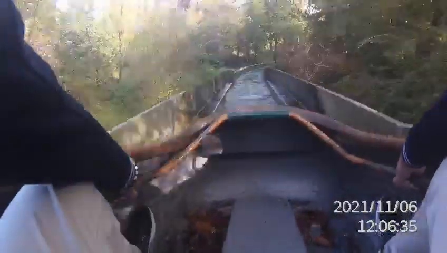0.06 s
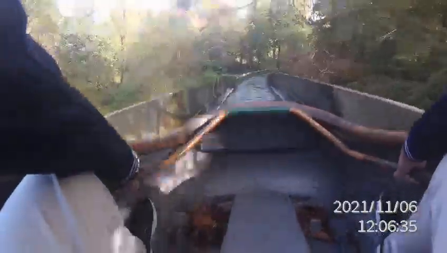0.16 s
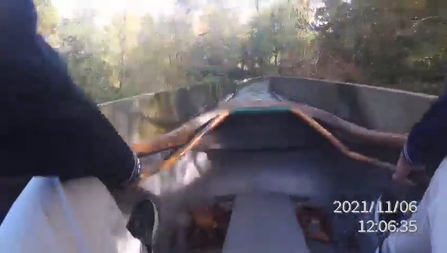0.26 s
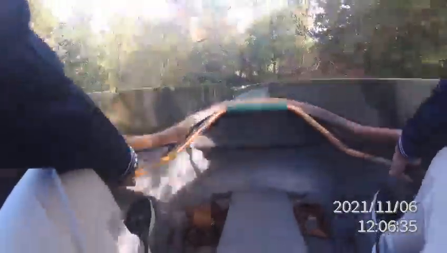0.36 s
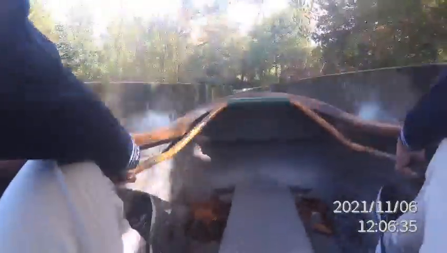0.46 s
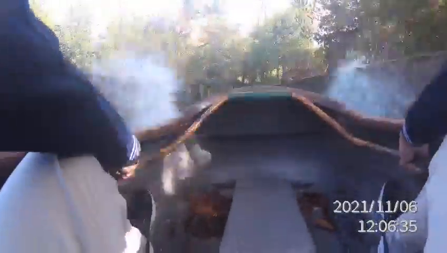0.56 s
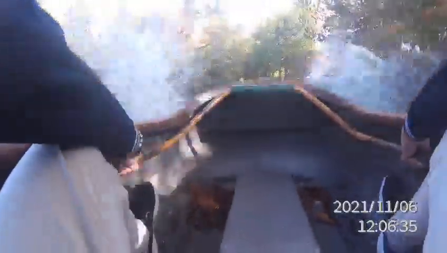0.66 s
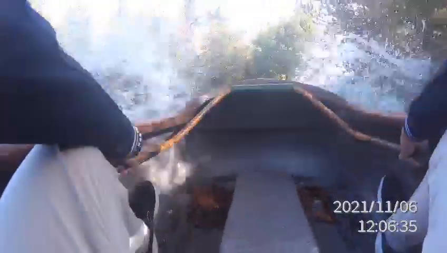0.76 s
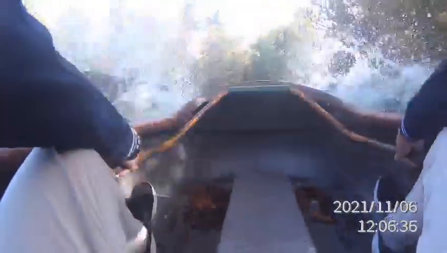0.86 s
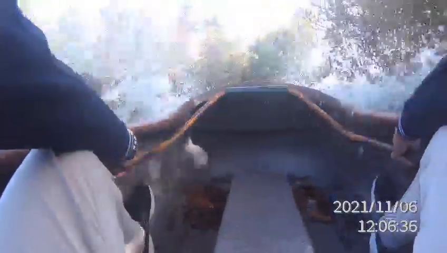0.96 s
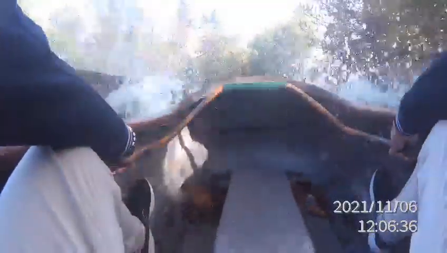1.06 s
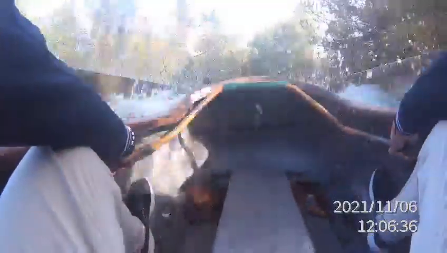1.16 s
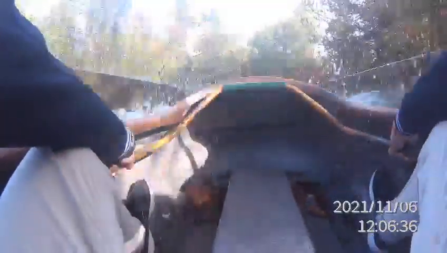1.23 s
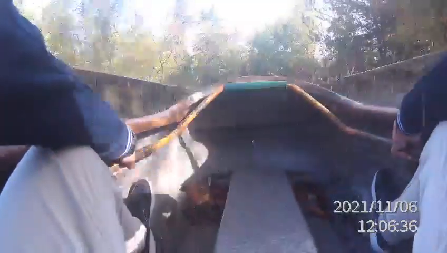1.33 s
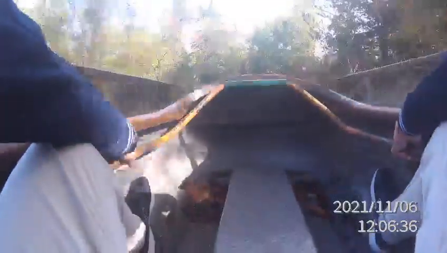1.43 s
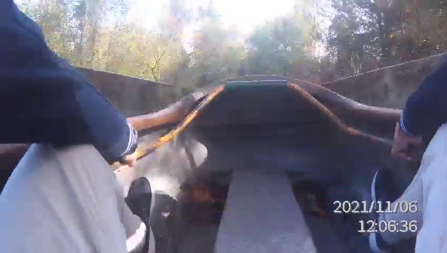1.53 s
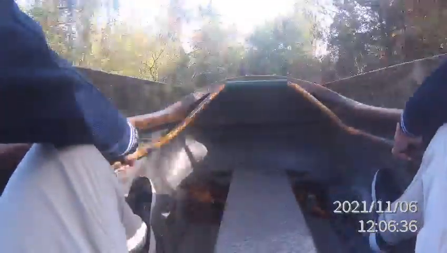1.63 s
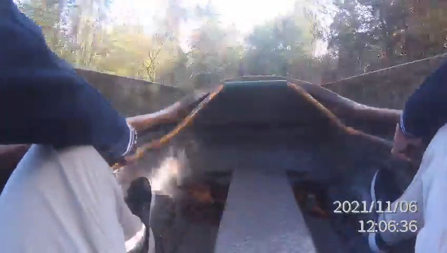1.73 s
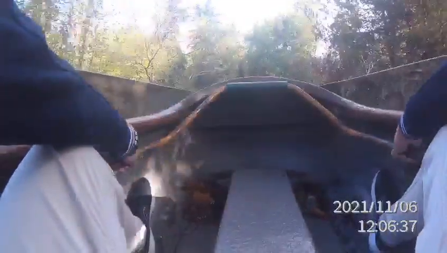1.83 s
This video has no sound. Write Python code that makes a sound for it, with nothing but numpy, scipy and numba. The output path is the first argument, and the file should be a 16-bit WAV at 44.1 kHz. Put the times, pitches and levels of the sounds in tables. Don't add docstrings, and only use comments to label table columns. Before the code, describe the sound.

A boat plunges into a pool outdoors. Rough low rolling and loud plastic clacks come first, then wet slaps and a full rushing splash, thinning to gentle wash with a few ticking drops, heard from a small case-mounted microphone aboard.

```python
import sys
import numpy as np
from scipy import signal
from scipy.fft import rfft, irfft, next_fast_len
from scipy.io import wavfile
from scipy.ndimage import uniform_filter1d
from numba import njit

SR = 44100
rng = np.random.default_rng(int(sys.argv[2]) if len(sys.argv) > 2 else 0)


def ratio_of_db(decibels):
    return 10 ** (np.asarray(decibels, float) / 20)


def to_wav(s):
    ch = np.atleast_2d(s).T
    pcm = np.round(np.clip(ch, -1, 1) * 32767)
    wavfile.write(sys.argv[1], SR, pcm.astype(np.int16))


N = 83790


def col(table, k):
    return np.interp(np.arange(N) / SR, *np.array(table).T[[0, k]])


def curve(table, hz):
    table_hz, value = np.array(table).T
    return np.interp(np.log(hz + 1), np.log(table_hz), value)


def unit(x):
    return x / np.sqrt(np.mean(x ** 2))


def walk(rate_hz):
    hold = int(SR / rate_hz)
    steps = np.repeat(rng.standard_normal(N // hold + 1), hold)
    return 0.91 * uniform_filter1d(uniform_filter1d(steps, hold), hold)[:N]


def add(out, at_s, piece):
    i = int(at_s * SR)
    out[..., i:i + piece.shape[-1]] += piece[..., :N - i]


@njit
def ring(at, hz, cycles, size, glide, length):
    y = np.zeros(length)
    for k in range(len(at)):
        w = 2 * np.pi * hz[k] / SR
        steps = int(cycles[k] * SR / hz[k])
        fade, phase = np.exp(-5 / (steps + 1)), 0.
        g = size[k]
        for i in range(at[k], min(at[k] + steps, length)):
            phase += w * (1 + glide * (i - at[k]) / steps)
            y[i] += g * np.sin(phase)
            g *= fade
    return y


TOP_HZ = 15300
# centre_hz, width_hz, level_db
CASE_PEAKS = [(297, 20, 2), (461, 100, 3.5), (821, 40, 6), (1640, 120, 1.5), (2990, 88, 4.5),
              (3520, 440, 5.5), (4940, 110, 1), (5060, 900, 4.5)]
# freq_hz, share (0-1)
ALIKE = [(200, 1), (450, 0.85), (1200, 0.85), (1550, 0), (2300, 1), (2800, 0.43), (5000, 0), (15000, 0)]


def rush(spectrum, per_s, cycles, grain_db, scatter_db, flicker_db):
    hz = np.arange(N // 2 + 1) * SR / N
    rings_db = sum(db / (1 + (2 * (hz - f) / w) ** 2) for f, w, db in CASE_PEAKS)
    colour = ratio_of_db(curve(spectrum, hz) + rings_db) * (hz < TOP_HZ)
    fields = []
    for _ in range(2):
        when, height, rarity = rng.random((int(per_s * N / SR), 3)).T
        pitch_hz = 150 * 100 ** height
        size = pitch_hz / 1000 * ratio_of_db(-scatter_db * np.log(1 - .97 * rarity))
        grains = ring((when * N).astype(np.int64), pitch_hz, cycles + 0 * pitch_hz, size, 0.34, N)
        hiss = unit(rng.standard_normal(N))
        fields.append(rfft(hiss + ratio_of_db(grain_db) * unit(grains)) * colour)
    alike = np.clip(curve(ALIKE, hz), 0, 1)
    left = alike * fields[0] + np.sqrt(1 - alike ** 2) * fields[1]
    pair = np.array([left, fields[0]])
    out, shared = 0, walk(40.15)
    for centre_hz in 45 * 2. ** np.arange(0, 9):
        octaves = np.clip(np.log2((hz + 1) / centre_hz), -1, 1)
        band = np.cos(np.pi / 2 * octaves) ** 2
        out = out + irfft(pair * band, N) * ratio_of_db(flicker_db * (shared + walk(25.07)))
    return out / np.sqrt(np.mean(out[1] ** 2))


# start_s, surge_db, spray_db, mist_db
SPLASH = [(.358, -61, -49, -66), (.367, -34, -34.5, -70), (.47, -31, -32.5, -70), (.57, -29, -27.5, -38.5),
          (.68, -34, -30.5, -42), (.76, -33, -31.5, -43.5), (.95, -31.5, -35, -46.5),
          (1.2, -35.5, -34.5, -48), (1.5, -34.5, -36, -50.5), (1.65, -38.5, -41.5, -60),
          (1.9, -40.5, -43.5, -55)]
# freq_hz, density_db (per Hz)
SURGE = [(50, -43), (130, -10.5), (300, -2), (480, -2.5), (620, -4), (900, -4), (1500, 2.5), (2600, -25.5)]
# freq_hz, density_db (per Hz)
SPRAY = [(900, -43), (1600, -8.5), (2300, -3), (3100, -2), (5500, -12), (6500, -16), (9500, -27),
         (15000, -23)]
# freq_hz, density_db (per Hz)
MIST = [(3000, -15.5), (6000, 0.5), (8000, -1.5), (10000, -4), (12500, -0.5), (15000, 7.5)]


def water():
    surge = rush(SURGE, per_s=700, cycles=11.5, grain_db=-7, scatter_db=2.5, flicker_db=0.0)
    spray = rush(SPRAY, per_s=1250, cycles=3.4, grain_db=-9.5, scatter_db=1.5, flicker_db=1.49)
    mist = rush(MIST, per_s=780, cycles=2.8, grain_db=-3.0, scatter_db=2.5, flicker_db=-2.0)
    return surge * ratio_of_db(col(SPLASH, 1)) + spray * ratio_of_db(col(SPLASH, 2)) + mist * ratio_of_db(col(SPLASH, 3))


# start_s, level_db (6 dB under the right port's peak), low_hz, high_hz, high_re_low_db
KNOCKS = [(.004, -35, 880, 3680, 12), (0.0445, -21.5, 890, 1800, -4.5), (.045, -27, 430, 623, -1),
          (.0730, -25, 3670, 2520, -11), (.0755, -25, 1760, 880, -5), (0.079, -37, 900, 3700, -2),
          (0.1042, -32, 1830, 3750, 6), (.111, -33, 477, 3730, -6), (0.1227, -16, 1865, 2196, -7),
          (0.1234, -22, 2910, 3704, -4), (.124, -23, 467, 800, 3.5), (0.163, -28, 1850, 3460, -10),
          (0.2075, -27, 1870, 3100, -2), (0.2345, -27.5, 1530, 3060, -4), (.2392, -16.5, 877, 1697, 2),
          (0.271, -27, 870, 1680, -5), (0.3042, -3.5, 1180, 1730, 2.5), (.3047, -0.5, 2634, 3220, -2.5),
          (.3346, -31.5, 2000, 3870, -9), (.387, -22, 1840, 810, -4), (0.445, -14, 2880, 3770, -5),
          (0.45, -17.5, 894, 1840, 3), (0.4749, -10, 1874, 3700, -4), (0.4742, -14.5, 1518, 3290, -1),
          (0.475, -19, 1210, 2370, -10), (0.8324, -14.5, 1880, 3790, -2), (0.8335, -18, 5100, 2180, -9),
          (0.9515, -21, 2370, 3440, 6), (1.2859, -25.5, 1710, 3047, 3), (1.3578, -30, 5370, 3740, -6),
          (1.3621, -14, 1540, 3440, 6.5), (1.3622, -21, 5150, 3120, -1), (1.3655, -26, 1530, 3180, -5)]
CASE_HZ = [465, 855, 1020, 1220, 1530, 1720, 1850, 2000, 2260, 2520, 3040, 3330, 3790, 5150]
CASE_T60_S, SPREAD_OCT, STRAY_DB = 0.012, 0.12, -16.5
CONTACT_S, SOFT_PER_DB = 0.00048, 1.27
CRACK_DB, CRACK_HZ, CRACK_DECAY_S = -44, 5900, 0.00073
KNOCK_LEFT_DB, KNOCK_LEFT_LOW_DB = -2.5, -6


def knocks():
    out, t = np.zeros((2, N)), np.arange(2200) / SR
    base_hz = np.array(CASE_HZ)[:, None]
    chance = rng.standard_normal((len(KNOCKS), 3, len(CASE_HZ), 1))
    lowpass = signal.butter(2, CRACK_HZ, fs=SR)
    noise = signal.lfilter(*lowpass, rng.standard_normal((len(KNOCKS), 2, 2200)))
    decay = np.exp(-np.log(1000) * t / CASE_T60_S * np.maximum(1, base_hz / 3000))
    left_gain = ratio_of_db(np.where(base_hz > 1300, KNOCK_LEFT_DB, KNOCK_LEFT_LOW_DB))

    def near(pitch_hz):
        return np.exp(-(np.log2(base_hz / pitch_hz) / SPREAD_OCT) ** 2)

    for (start_s, db, low, high, high_db), (stray, detune, turn), crack in zip(KNOCKS, chance, noise):
        gain = near(low) + ratio_of_db(high_db) * near(high)
        gain = gain + ratio_of_db(STRAY_DB + 3.16 * stray) * np.minimum(1, (2.35 * high / base_hz) ** 3)
        rise_s = CONTACT_S * SOFT_PER_DB * -min(db, 0)
        swell = gain * (1 - np.exp(-t / rise_s)) * decay
        hz = base_hz * (1 + 0.012 * detune)
        hz[np.abs(base_hz - low).argmin()] = low
        hz[np.abs(base_hz - high).argmin()] = high
        phase = 2 * np.pi * hz * t
        left = (left_gain * swell * np.sin(phase + turn)).sum(0)
        right = (swell * np.sin(phase)).sum(0)
        both = np.array([left, right]) / np.abs(right).max()
        both = both + ratio_of_db(CRACK_DB) * (high / 3000) ** 2 * crack * np.exp(-t / CRACK_DECAY_S)
        add(out, start_s, both * ratio_of_db(db + 6))
    return out


# start_s, peak_db, pitch_hz, t60_s, left_db
SLAPS = [
    (.239, -1, 1100, 0.0051, -8),
    (0.365, -20, 1370, 0.023, -4),
    (.374, -16, 950, 0.021, -2),
    (.381, -22.5, 680, 0.027, -6),
    (.397, -22.5, 850, 0.029, -4),
    (1.4035, -20, 603, 0.013, -2),
]


def slaps():
    out, t = np.zeros((2, N)), np.arange(2000) / SR
    for start_s, db, hz, t60_s, left_db in SLAPS:
        level = ratio_of_db(db + np.array([[left_db], [0]]))
        fade = (1 - np.exp(-t * hz * 4)) * 1000. ** (-t / t60_s)
        add(out, start_s, level * np.sin(2 * np.pi * hz * t) * fade)
    return out


# start_s, peak_db, pitch_hz, t60_s
BOOMS = [(.072, -14, 251, 0.019), (.271, -21, 240, 0.031), (.239, -24, 488, 0.048), (0.3, -50, 55, 0.057),
         (0.368, -23.5, 327, 0.077), (0.371, -30.5, 118, 0.18), (0.424, -23, 276, 0.17),
         (0.441, -31.5, 119, 0.1), (0.758, -36.5, 137, .2), (.96, -33.5, 256.6, 0.28),
         (1.659, -40.5, 175, 0.31)]


def booms():
    out, t = np.zeros(N), np.arange(12000) / SR
    for start_s, db, hz, t60_s in BOOMS:
        fade = (1 - np.exp(-t * hz / 0.89)) * 1000. ** (-t / t60_s)
        add(out, start_s, ratio_of_db(db) * np.sin(2 * np.pi * hz * t) * fade)
    return out


# start_s, peak_db, pitch_hz
DROPS = [
    (0.1214, -39, 5200),
    (0.389, -33, 13500),
    (0.477, -27, 14000),
    (1.2862, -20, 12360),
    (1.287, -24.5, 6950),
    (1.363, -17.5, 14700),
    (1.362, -24.5, 11100),
    (1.3634, -27.5, 7760),
    (1.502, -40, 14460),
]
DROP_DECAY_S, DROP_HISS = 0.00077, .8


def drops():
    out, t = np.zeros((2, N)), np.arange(300) / SR
    for start_s, db, hz in DROPS:
        hiss = DROP_HISS * rng.standard_normal(len(t))
        tick = (np.sin(2 * np.pi * hz * t) + hiss) * np.exp(-t / DROP_DECAY_S)
        add(out, start_s, ratio_of_db(db) * tick * ratio_of_db(np.array([[-9], [0]])))
    return out


# start_s, hum_hz, level_db
WHEELS = [
    (0, 89, -48.5),
    (.14, 106.7, -45.5),
    (.27, 113.5, -38),
    (.31, 116.6, -54),
    (.42, 109.3, -46),
    (.56, 94.7, -50.5),
    (.72, 82.9, -52),
    (1.1, 85, -57),
    (1.5, 71, -62),
    (1.58, 69, -81),
]


def wheels():
    hum_hz = col(WHEELS, 1) * (1 + 0.066 * walk(32.4))
    phase = 2 * np.pi * np.cumsum(hum_hz) / SR
    hum = (1 + 0.24 * walk(33.0)) * np.sin(phase) + 1.1 * walk(38.6) * np.cos(phase)
    return hum * ratio_of_db(col(WHEELS, 2))


# freq_hz, density_db (per Hz)
AIR = [(24, -57), (40, -18), (260, -4), (1020, -9), (2330, -10), (4800, -33), (6010, -33), (12700, -29),
       (15500, -26)]
AIR_DB, AIR_FADE_DB_PER_S = -38, -4


def air():
    flow = rush(AIR, per_s=400, cycles=12.0, grain_db=-7.5, scatter_db=4.5, flicker_db=3.5)
    return flow * ratio_of_db(AIR_DB + AIR_FADE_DB_PER_S * np.arange(N) / SR)


def scene():
    return water() + knocks() + slaps() + booms() + drops() + wheels() + air()


def roll_off(x):
    return signal.sosfilt(signal.butter(12, 16110, fs=SR, output="sos"), x)


CAVITY_HZ, CAVITY_Q, LEAK, LEFT_TREBLE_DB = 1027, 4.63, 1, -0.5
DUCT_HZ, DUCT_NOTCH_HZ, DUCT_Q = 527, 581, 1.74


def record(dry):
    size = next_fast_len(N + 4096)
    hz = np.arange(size // 2 + 1) * SR / size

    def resonator(centre_hz, q):
        return 1 - (hz / centre_hz) ** 2 + 1j * hz / centre_hz / q

    tilt = (1 + 1j * hz / 4000 * ratio_of_db(LEFT_TREBLE_DB)) / (1 + 1j * hz / 4000)
    cavity = (1 / resonator(CAVITY_HZ, CAVITY_Q) + LEAK * tilt) / (1 + LEAK)
    duct = resonator(DUCT_NOTCH_HZ, DUCT_Q) / resonator(DUCT_HZ, DUCT_Q)
    left = irfft(rfft(dry[0], size) * cavity * duct, size)[:N]
    clipped = np.clip(np.array([left, dry[1]]), -1, 1)
    lowpass = signal.butter(8, 16000, fs=SR, output="sos")
    return roll_off(signal.sosfilt(lowpass, clipped))


dry = scene()
out = record(dry)
to_wav(out)
```